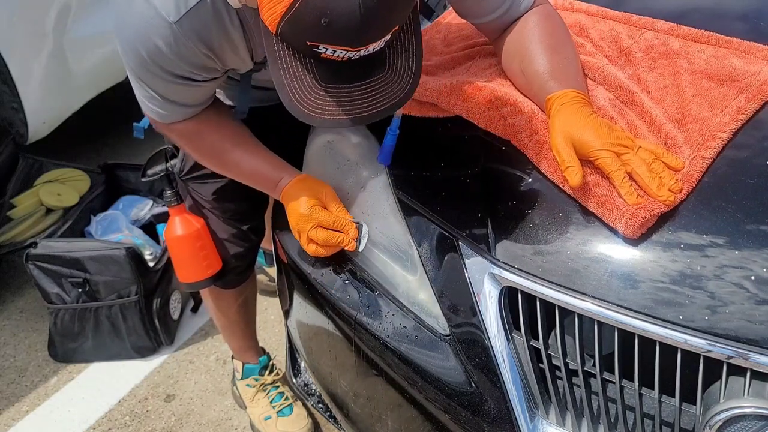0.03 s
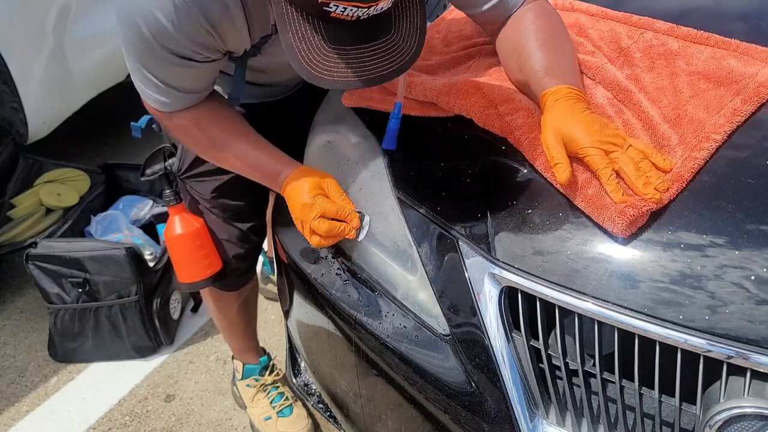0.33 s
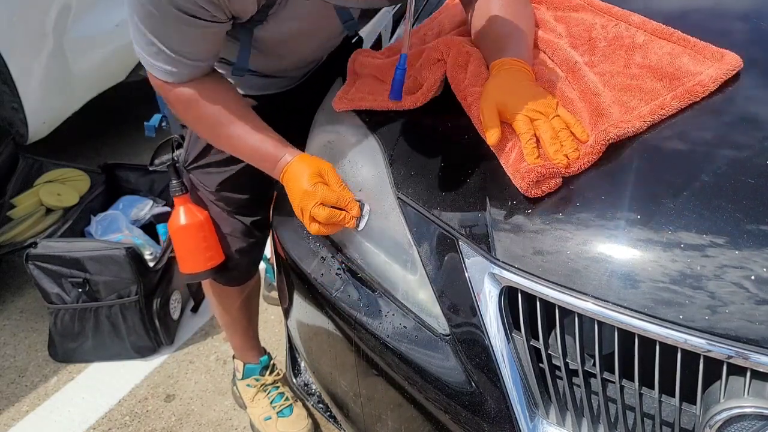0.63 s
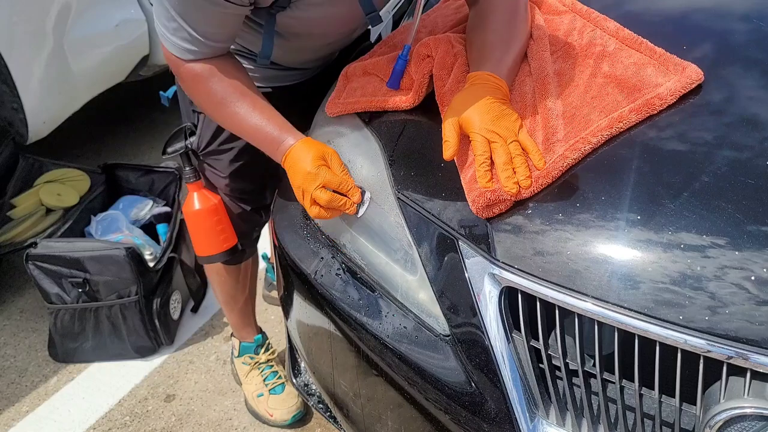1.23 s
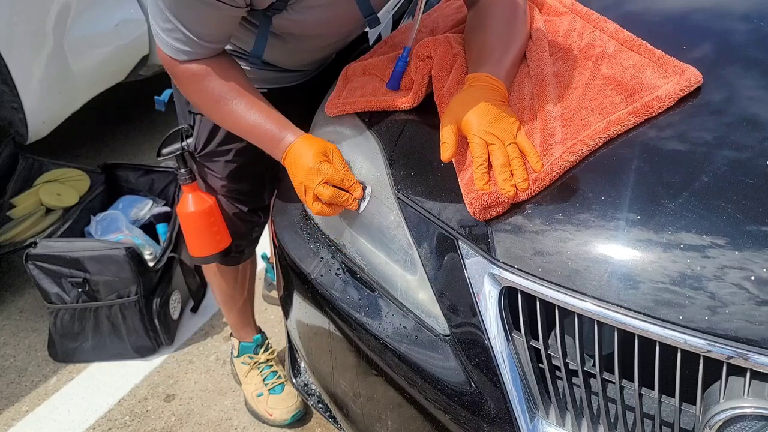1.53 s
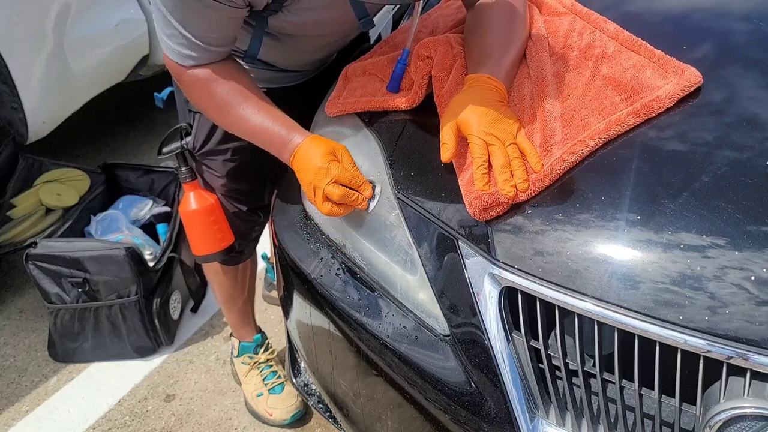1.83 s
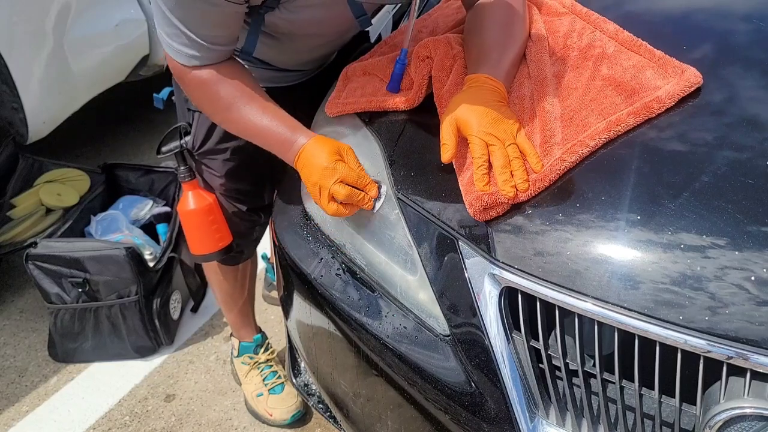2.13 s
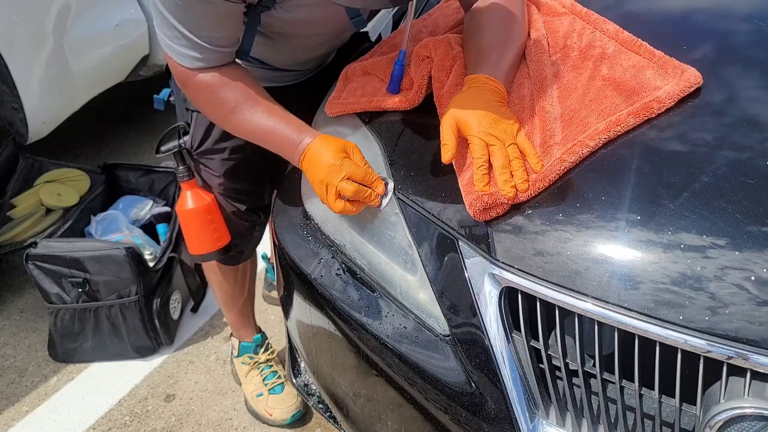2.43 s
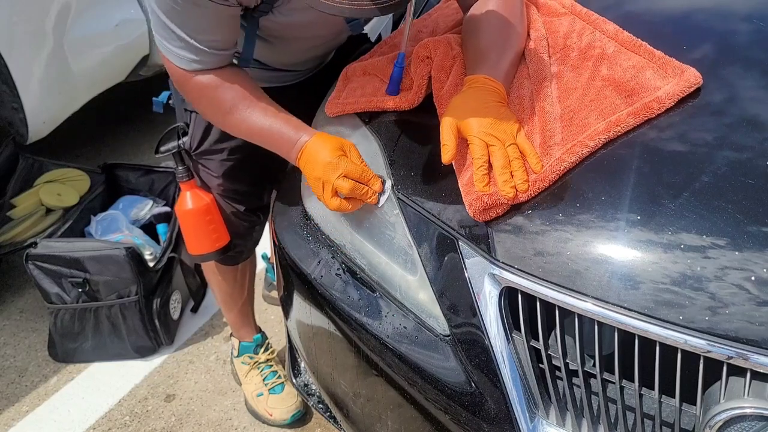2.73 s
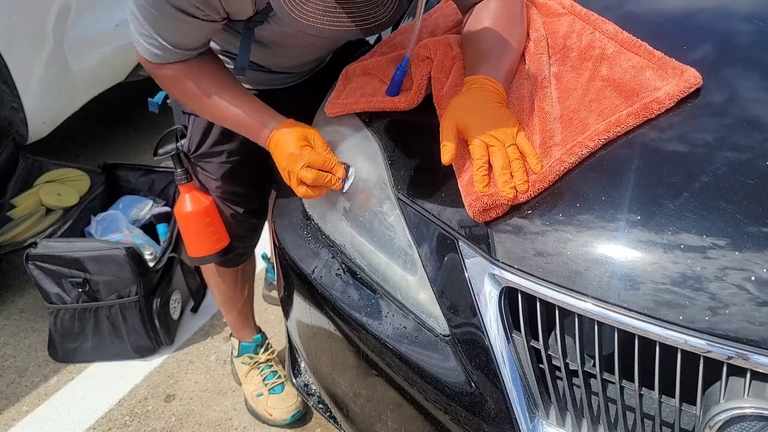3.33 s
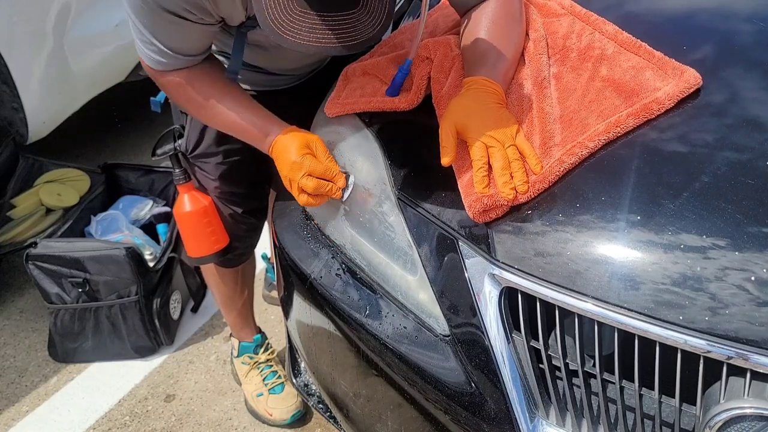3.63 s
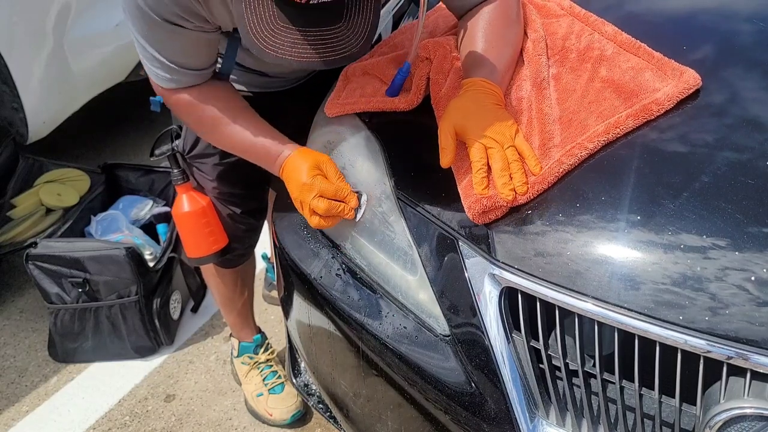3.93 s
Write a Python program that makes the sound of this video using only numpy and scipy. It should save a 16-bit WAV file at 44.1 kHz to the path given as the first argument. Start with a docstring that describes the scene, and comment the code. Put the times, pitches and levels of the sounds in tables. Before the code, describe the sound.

Quick, gritty back-and-forth sanding of a plastic headlight, with wind and a distant traffic roar.

```python
"""A gritty hiss goes quickly to and fro: a small abrasive pad rubbing a plastic headlight, outdoors.
The hiss follows the speed of the hand and dips at most turns, sometimes with a tiny squeak.
Now and then the pad grips harder, and once a harsh rasp makes the lens ring.
All along, wind buffets the microphones over a steady roar like distant traffic."""
import sys
import numpy as np
from scipy import signal
from scipy.fft import rfft, irfft
from scipy.io import wavfile
from scipy.ndimage import uniform_filter1d

SR = 44100
rng = np.random.default_rng(int(sys.argv[2]) if len(sys.argv) > 2 else 0)


def to_wav(s):
    """Save 16-bit WAV."""
    ch = np.atleast_2d(s).T  # columns
    pcm = np.round(np.clip(ch, -1, 1) * 32767)  # PCM
    wavfile.write(sys.argv[1], SR, pcm.astype(np.int16))


N = 176400
TIME, FREQS = np.arange(N) / SR, np.fft.rfftfreq(N, 1 / SR)


def amp(db):
    """Turns decibels into a number to multiply by."""
    return 10 ** (np.asarray(db) / 20)


def unit(x):
    """Scales a signal to an average power of 1."""
    return x / np.sqrt(np.mean(x ** 2) + 1e-20)


def by_hz(points):
    """Joins (pitch_hz, value) points into a curve over all pitches."""
    hz, value = np.transpose(points)
    return np.interp(np.log(FREQS + 1), np.log(hz + 1), value)


def by_time(points):
    """Joins (time_s, value) points into a curve over the whole scene."""
    return np.interp(TIME, *np.transpose(points))


def resonance(hz, width_hz):
    """A peak that lets through the pitches near hz."""
    return 1 / (1 + (2 * (FREQS - hz) / width_hz) ** 2)


def wander(rate_hz):
    """A smooth random wobble, mostly slower than rate_hz."""
    return unit(irfft(rfft(rng.standard_normal(N)) / (1 + (FREQS / rate_hz) ** 4), N))


def at_microphones(drive, gain, likeness=0, pan_db=0):
    """Filters two noises into left and right; likeness 1 makes them alike, pan_db > 0 leans left."""
    left, other = rfft(drive)
    right = likeness * left + np.sqrt(1 - likeness ** 2) * other
    tilt = amp(pan_db)
    return irfft(np.array([left * tilt, right]) * gain * np.sqrt(SR / (1 + tilt ** 2)), N)


def grit(coarse_share=0.32, grains_per_s=5600, spread_db=6):
    """Two streams of rubbing noise: countless fine grains and some coarse ones that snap."""
    sizes = amp(spread_db * np.minimum(rng.exponential(1, (2, N)), 5))
    hits = rng.random((2, N)) < grains_per_s / SR
    coarse = unit(sizes * hits * rng.choice([-1, 1], (2, N)))
    fine = rng.standard_normal((2, N))
    return np.sqrt(coarse_share) * coarse + np.sqrt(1 - coarse_share) * fine


def patchy(x, depth_db=1.5):
    """The pad's contact keeps shifting: patches about 1 kHz wide and 30 ms long swell and fade."""
    spectra = signal.stft(x, nperseg=256)[2]
    patches = uniform_filter1d(rng.standard_normal(spectra.shape[1:]), size=6, axis=0)
    patches = unit(uniform_filter1d(patches, size=10, axis=1))
    return signal.istft(spectra * amp(depth_db * patches), nperseg=256)[1][:, :N]


def scrub(speed_up_s=0.009, slow_down_s=0.0145, steepness=2.8):
    """Grit hisses while the pad slides: each stroke starts briskly and slows into the next turn."""
    # hand strokes, each lasting until the next: start_s, level_db, opening_turn_db
    strokes = [(-.09, -0.2, 0.5), (0.055, 0.2, -20), (.197, 0.3, -3.5), (0.354, 0.5, -12),
               (0.505, -0.5, -7), (.648, -0.5, 0.5), (.794, -1.5, -10.5), (.938, -0.6, -1),
               (1.088, -1.5, 5.5), (1.239, -0.5, -9), (1.384, 0, -3.5), (1.523, -1.3, -12),
               (1.662, 0.7, -10), (1.801, -0.3, -15), (1.935, 1.5, -14), (2.069, 0, -5), (2.203, -0.3, -14),
               (2.332, -1, -15), (2.463, 0.5, -11), (2.598, -0.4, -12), (2.724, 0, -19), (2.846, -2, -12),
               (2.983, -1, -17), (3.111, -3, -9), (3.241, -2, -16), (3.362, -1.2, -12), (3.489, -1, -16),
               (3.614, -0.5, -14), (3.737, -1, -12), (3.855, -0.8, -12), (3.979, 1.5, -17), (4.11, 0, -12)]
    # coarse grains that snap just before the rasp: start_s, level_db
    grain_snaps = [(1.068, -4), (1.074, -7)]
    # tone of the hiss: pitch_hz, level_db
    colour = [(500, -108), (1800, -99), (3200, -98), (4300, -99), (5400, -97), (6800, -96), (8300, -100.5),
              (9300, -107), (10300, -105.5), (11200, -102.5), (13500, -100.8), (16000, -102.5)]
    # where the hiss sits: pitch_hz, left_minus_right_db
    pan = [(2000, 0), (4000, 0), (5000, 3), (5600, -2.5), (6700, -2), (7400, 3), (7900, 3), (8500, 10),
           (9200, 0.5), (11500, -1), (15000, 7.5)]
    start_s, level_db, turn_db = np.transpose(strokes)
    stroke = np.clip(np.searchsorted(start_s, TIME) - 1, 0, len(start_s) - 2)
    since, until = abs(TIME - start_s[stroke]), abs(start_s[stroke + 1] - TIME)
    speed = 1 - np.exp(-(since / speed_up_s) ** steepness)
    speed *= 1 - np.exp(-(until / slow_down_s) ** steepness)
    nearest_turn = stroke + (until < since)
    force = speed * amp(level_db[stroke]) + (1 - speed) * amp(turn_db[nearest_turn])
    snaps = sum(amp(db + 7) * (TIME > s) * np.exp(-abs(TIME - s) / 0.0012) for s, db in grain_snaps)
    drive = patchy(grit()) * (force + snaps)
    pressure = amp(0.5 + 0.73 * wander(rate_hz=28))  # the hand is a little unsteady
    return at_microphones(drive * pressure, amp(by_hz(colour)), likeness=-0.26, pan_db=by_hz(pan))


def bodywork(hiss):
    """Close echoes off the car's body strengthen some pitches of the hiss and weaken others."""
    # the echoes: delay_s, level_db
    echoes = [(.0011, -50), (.0027, -18), (.0064, -13)]
    comb = 1 + sum(amp(db) * np.exp(-2j * np.pi * FREQS * delay_s) for delay_s, db in echoes)
    return irfft(rfft(hiss) * comb / np.sqrt(np.mean(abs(comb) ** 2)), N)


def roar(lag_s=0.00051):
    """Steady far noise from both sides swells a little; it takes lag_s to pass between the microphones."""
    # tone of the roar: pitch_hz, level_db
    colour = [(30, -82), (150, -77), (330, -76.4), (560, -77.4), (790, -73.7), (1000, -78.3), (1280, -81),
              (1800, -86), (2200, -93), (3000, -99.5), (4500, -106), (7000, -110), (9400, -124),
              (13000, -120), (16000, -121)]
    # its slow swell: time_s, level_db
    swell = [(0, -1), (.9, -1.5), (1.6, -2.5), (2.05, -2.5), (2.35, 0.5), (2.7, -0.5), (3.1, 0),
             (3.6, 0.25), (4, 0.5)]
    # how alike the two sides are before the lag: pitch_hz, likeness
    alike = [(250, 0.4), (480, 0.99), (750, 0.95), (1200, 0.74), (1900, 0.19), (3000, 0.3)]
    likeness = by_hz(alike) * np.cos(2 * np.pi * FREQS * lag_s)
    far = at_microphones(rng.standard_normal((2, N)), amp(by_hz(colour)), likeness, pan_db=-1.6)
    return far * amp(by_time(swell))


def wind():
    """Swirling air at the microphones makes a deep rumble and a flutter above it, both in gusts."""
    # tone of each layer: pitch_hz, level_db
    rumble = [(10, -16), (25, -7), (42, -3.5), (58, 4.5), (78, 2), (100, -5.5), (130, -20), (200, -56),
              (400, -79)]
    flutter = [(60, -23), (125, 7), (170, -1.5), (250, -6.5), (400, -23.5), (900, -35), (3000, -101)]
    # gusts of each layer: time_s, level_db
    rumble_gusts = [(0.0, -41.5), (0.035, -51), (0.06, -33.5), (0.2, -37.5), (0.62, -38), (0.72, -42.5),
                    (0.8, -35), (1.05, -36), (1.25, -42), (1.55, -39), (1.63, -41), (2.0, -44),
                    (2.37, -37.5), (2.45, -42.5), (2.65, -40.5), (3.05, -35.5), (3.4, -41), (4.0, -38)]
    flutter_gusts = [(0.0, -91), (0.07, -50), (0.62, -44), (0.67, -56), (0.98, -39), (1.2, -53),
                     (1.28, -43.5), (1.36, -54), (1.58, -38.5), (1.64, -54), (1.69, -49.5), (1.76, -51.5),
                     (1.9, -41.5), (1.96, -60.5), (2.61, -47.5), (4.0, -51)]
    out = np.zeros((2, N))
    for colour, gusts, gain_db in [(rumble, rumble_gusts, 4), (flutter, flutter_gusts, 0.5)]:
        air = at_microphones(rng.standard_normal((2, N)), amp(by_hz(colour)), likeness=0.35, pan_db=-2.4)
        even_air = air / np.sqrt(uniform_filter1d((air ** 2).mean(0), size=4000) + 1e-20)
        out += even_air * amp(by_time(gusts) + gain_db)
    return out


def buffets(half_length_s=0.011):
    """Single swirls of wind push the air at the microphones in and out once or twice."""
    # the swirls: time_s, level_db, pitch_hz
    swirls = [(0.068, -20, 69.4), (.14, -27.5, 73.4), (0.511, -29.5, 57), (0.791, -17.5, 80.7),
              (0.9, -27, 66), (.969, -25, 60.6), (1.191, -28, 75), (1.34, -23, 78), (1.453, -25.5, 91),
              (1.563, -24, 82.5), (2.061, -34.5, 73), (2.684, -25, 65), (2.781, -30, 69),
              (2.941, -24.5, 66.5), (3.224, -25.5, 64), (3.533, -26.5, 77), (3.611, -28, 64)]
    out = np.zeros((2, N))
    for time_s, db, hz in swirls:
        offset, skew = rng.standard_normal(2)
        near = abs(TIME - time_s) < 10 * half_length_s
        t = TIME[near] - time_s
        phase = 2 * np.pi * (hz * t + offset) + 0.44 * np.array([[skew], [-skew]])  # sides out of step
        out[:, near] += amp(db) * np.exp(-(t / half_length_s) ** 2) * np.sin(phase)
    return out


def squeaks(pitch_hz=13170, wobble_hz=120, rough_db=3.5):
    """The pad sticks and slips in a very high, brief, scratchy whistle, mostly near a turn."""
    # the slips: time_s, length_s, level_db
    slips = [(0.085, .01, -62.5), (.635, .014, -63), (2.058, 0.011, -60), (2.328, 0.0084, -70),
             (2.593, .011, -63.5), (2.843, .018, -66), (2.86, 0.0071, -57), (3.628, 0.022, -62)]
    level = sum(amp(db) * np.exp(-(2 * (TIME - s) / length_s) ** 2) for s, length_s, db in slips)
    tone = np.sin(2 * np.pi * np.cumsum(pitch_hz + wobble_hz * wander(rate_hz=323)) / SR)
    roughness = unit(amp(rough_db * wander(rate_hz=300)))
    return level * tone * roughness * amp([[4], [0.5]])  # louder on the left


def drags(half_length_s=0.021):
    """Now and then the pad grips harder and the plastic answers with a short, dull scrape."""
    # the harder grips: time_s, level_db
    grips = [(.18, -86), (1.4, -89), (1.63, -91), (2.3, -91.5), (2.58, -94), (3.2, -87), (3.63, -83),
             (3.97, -84)]
    level = sum(amp(db) * np.exp(-((TIME - s) / half_length_s) ** 2) for s, db in grips)
    return at_microphones(grit() * level, resonance(hz=1700, width_hz=920))


def rasp(coarse_share=0.12):
    """One hard scrape sets the lens ringing at many pitches, over a lower, hollow ring."""
    # strength of the scrape and of the low ring: time_s, level_db
    scrape_level = [(1.06, -41.5), (1.072, -19), (1.082, -24), (1.097, -10), (1.108, .5), (1.122, -6),
                    (1.135, -2), (1.151, 1), (1.168, -0.5), (1.18, -11.5), (1.23, -55)]
    low_level = [(1.07, -17), (1.1, 3), (1.12, -2.5), (1.14, -7.5), (1.165, -0.5), (1.2, -10), (1.232, -29),
                 (1.255, -3), (1.29, -27), (1.32, -60)]
    # broad tone of the scrape: pitch_hz, level_db
    broad_colour = [(150, -108), (420, -72), (750, -78), (1080, -76.5), (1550, -73), (2050, -76),
                    (2600, -75.5), (3500, -88.5), (4400, -103), (5300, -81.5), (6100, -81), (7200, -80.5),
                    (8000, -88), (9200, -93.5), (12000, -89.5), (16000, -101)]
    # pitches at which the lens rings: pitch_hz, width_hz, level_db
    lens = [(1396, 70, -69), (1668, 70, -71), (1876, 50, -68), (2294, 60, -69), (2488, 50, -75),
            (2812, 60, -72), (3170, 55, -72), (3762, 70, -73), (4040, 110, -77), (4390, 90, -77),
            (4880, 110, -74), (5795, 70, -73)]
    # where the scrape sits: pitch_hz, left_minus_right_db
    pan = [(500, -5.5), (3000, 0.5), (6800, -3), (8000, 10), (9500, 0), (15000, 2)]
    ring_power = sum((amp(db) * resonance(hz, width_hz)) ** 2 for hz, width_hz, db in lens)
    colour = np.sqrt(amp(by_hz(broad_colour)) ** 2 + ring_power)
    scrape = at_microphones(grit(coarse_share) * amp(by_time(scrape_level)), colour, pan_db=by_hz(pan))
    low_drive = grit(coarse_share) * amp(by_time(low_level) - 68)
    return scrape + at_microphones(low_drive, resonance(hz=800, width_hz=300))


def scene():
    """The rubbing in front, with wind and the distant roar around it."""
    air = wind() + buffets()
    return bodywork(scrub()) + drags() + squeaks() + rasp() + roar() + air


def record(dry):
    """Cuts away the very highest treble."""
    cutoff_hz = 15800
    low_pass = signal.firwin(511, cutoff_hz, window=("kaiser", 9), fs=SR)
    return signal.oaconvolve(dry, low_pass[None], "same")


dry = scene()
out = record(dry)
to_wav(out)
```